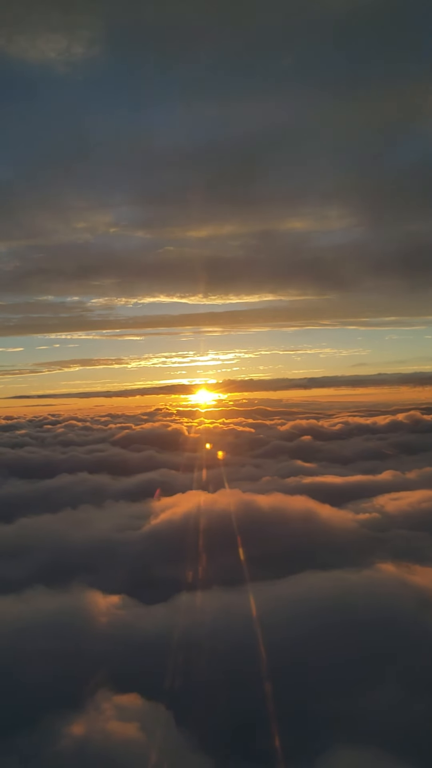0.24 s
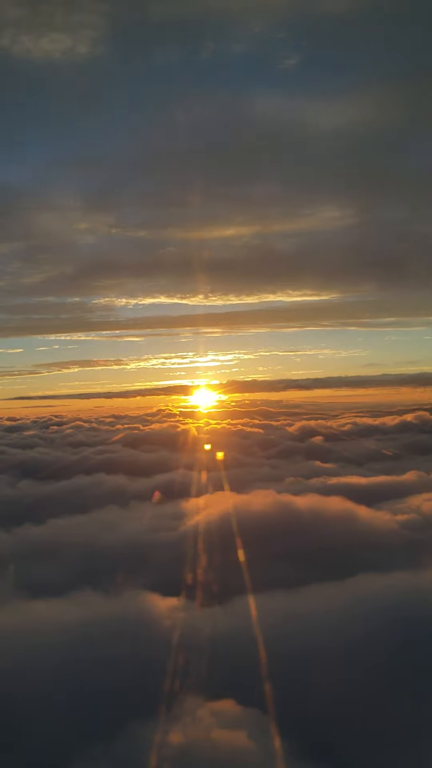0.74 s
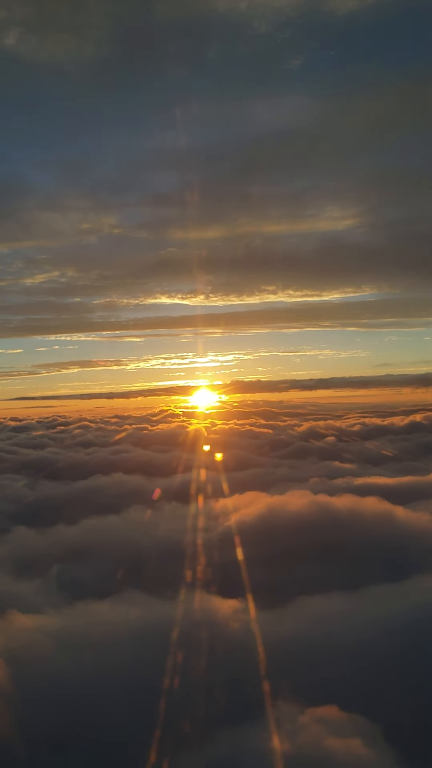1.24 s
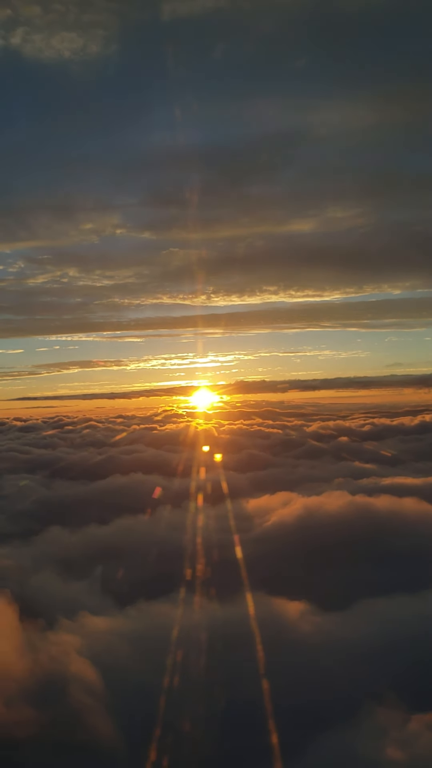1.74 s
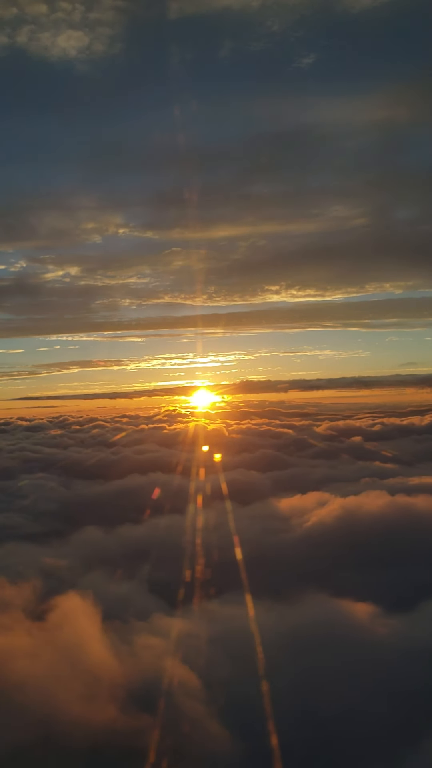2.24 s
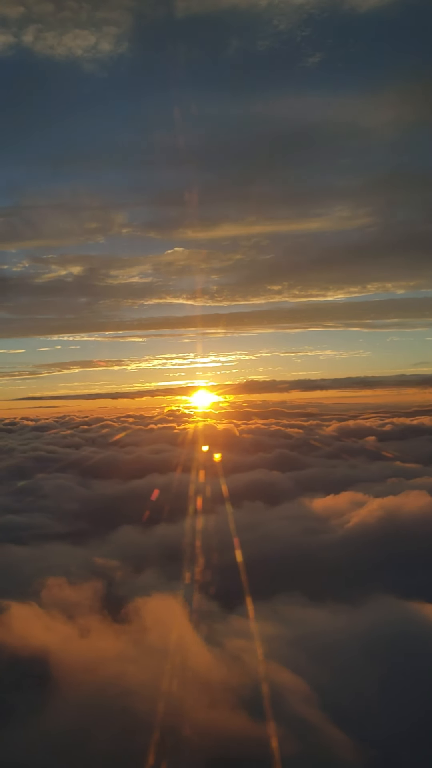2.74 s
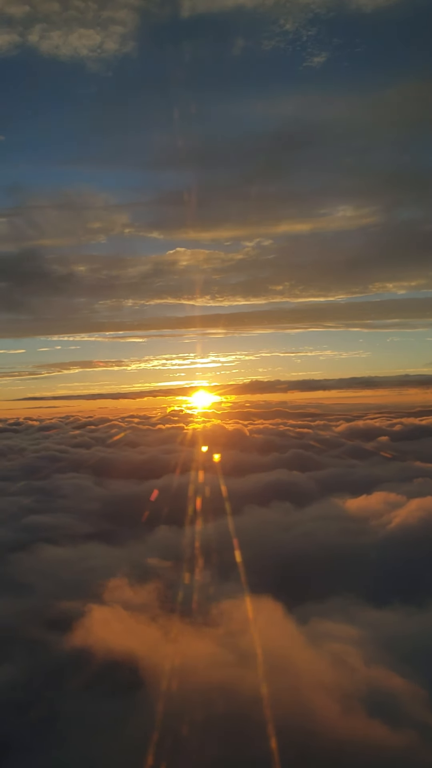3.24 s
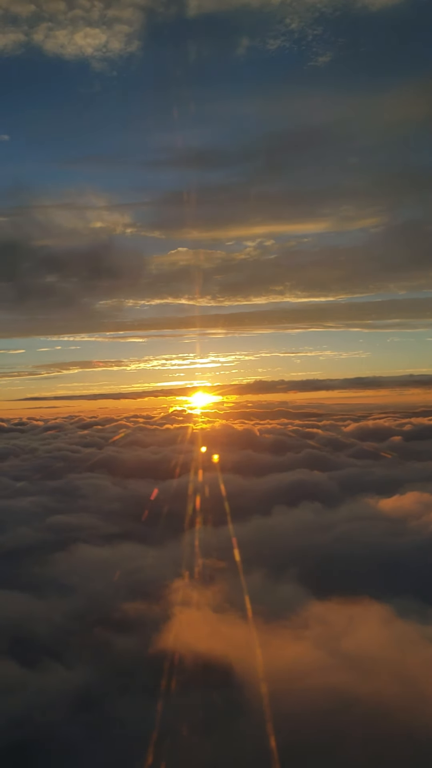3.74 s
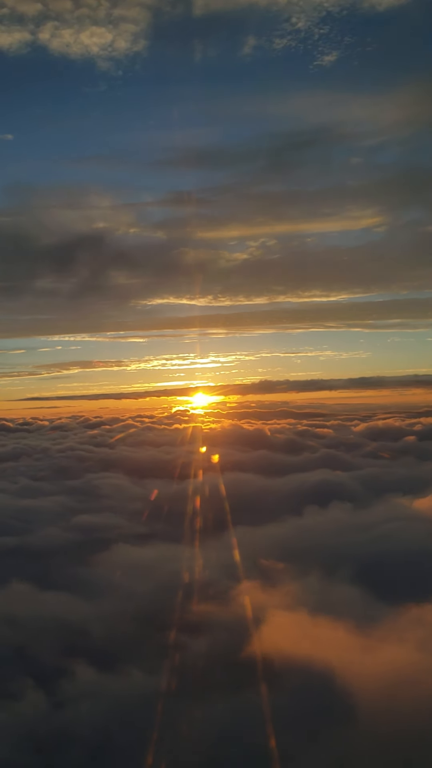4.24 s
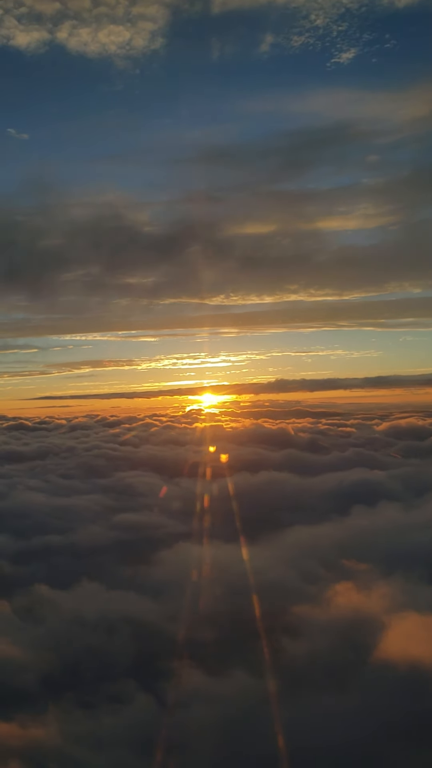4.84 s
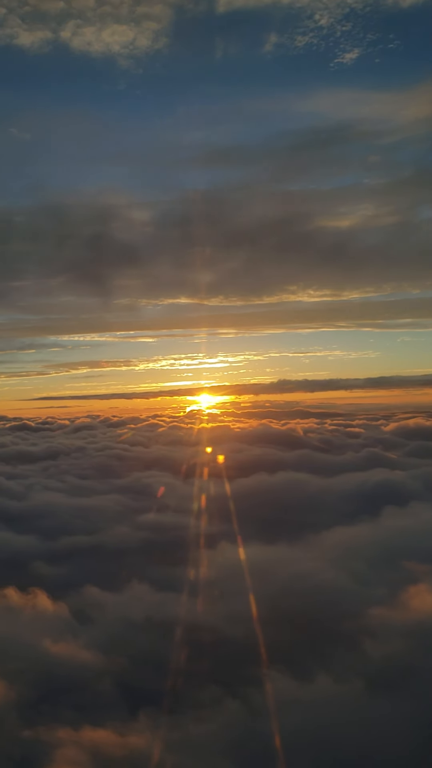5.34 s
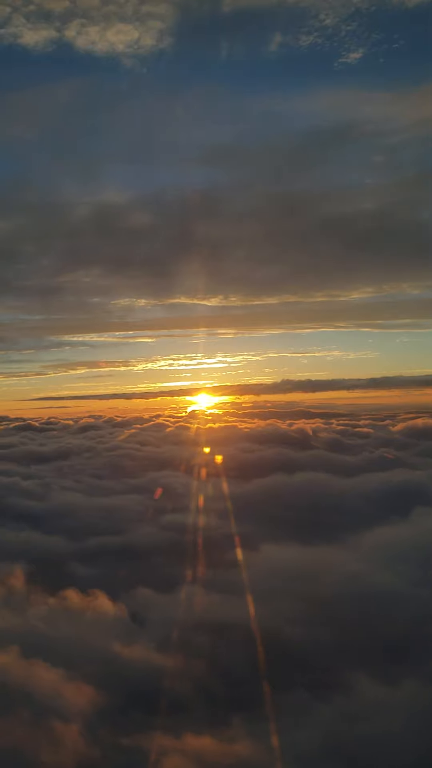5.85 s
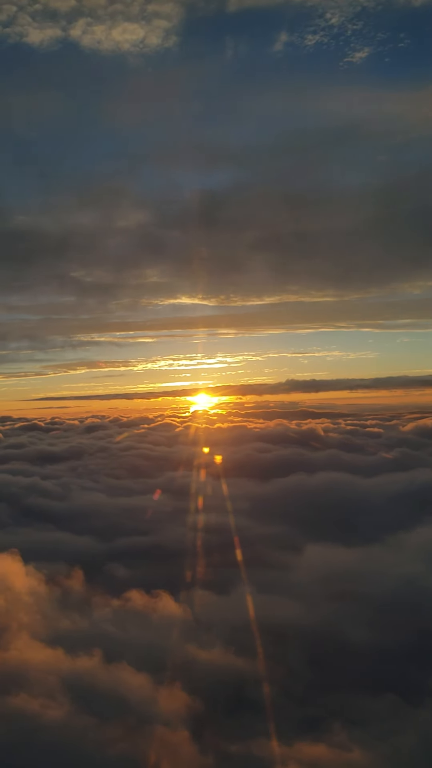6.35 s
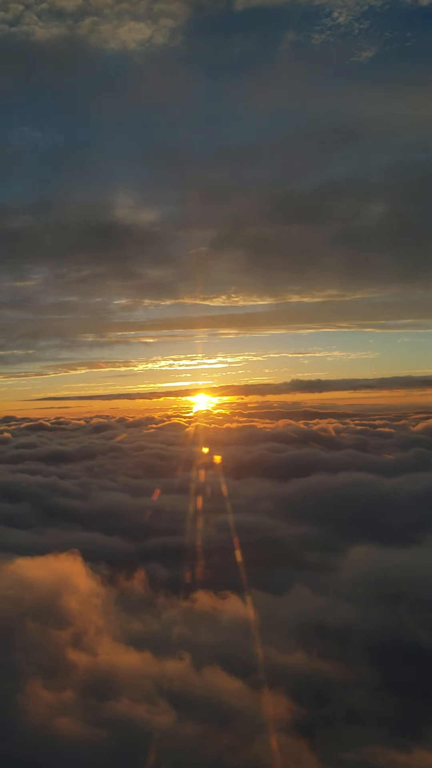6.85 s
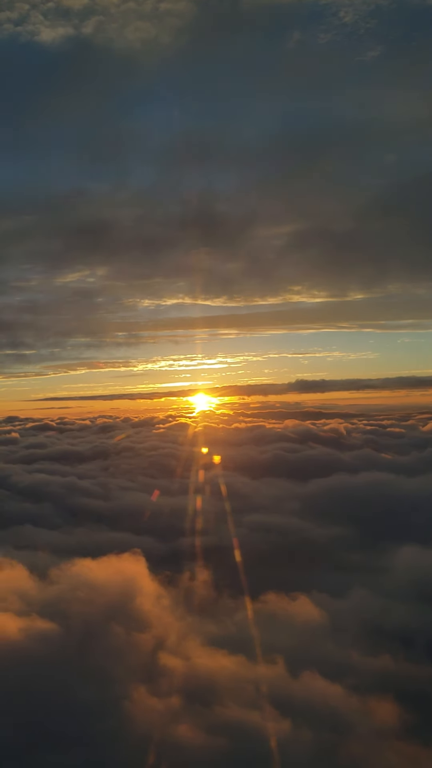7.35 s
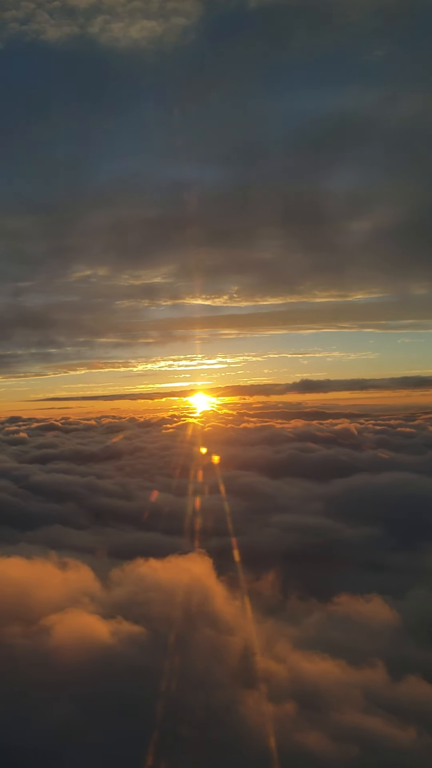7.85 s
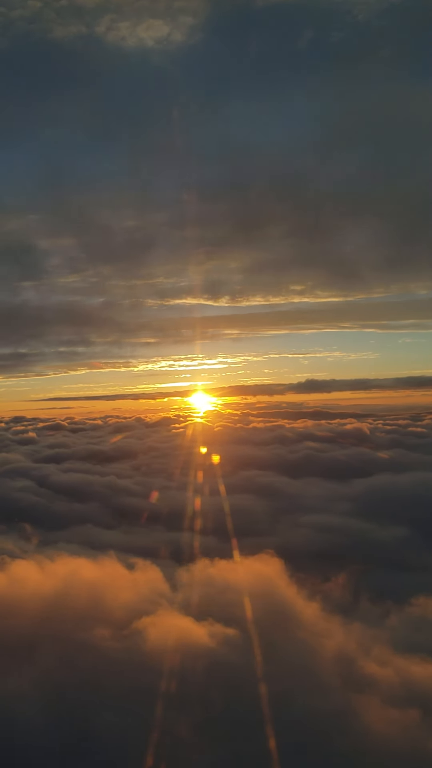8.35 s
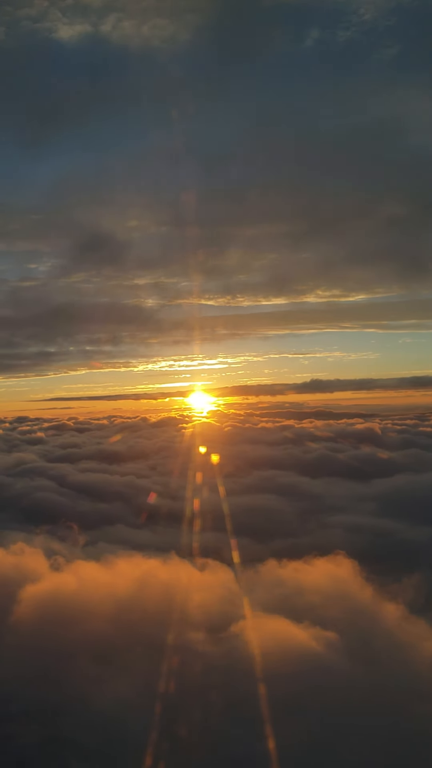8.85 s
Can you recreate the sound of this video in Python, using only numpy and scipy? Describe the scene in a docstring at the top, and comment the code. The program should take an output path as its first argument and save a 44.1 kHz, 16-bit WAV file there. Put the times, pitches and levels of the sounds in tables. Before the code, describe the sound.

Inside a cruising airliner, a steady, bass-heavy rush of air runs under a deep engine hum that gently swells and eases, with very faint high whines. Plastic trim clacks softly near the start, and a few tiny ticks follow, the sharpest about midway. Near the end something soft slides nearby with a faint squeaky rustle. The drone surrounds the microphone in the cabin.

```python
"""Inside an airliner in cruise. From the start, turbulent air along the hull excites the cabin's resonances,
and the engines add a deep hum, weak shaft tones and thin whines. Plastic trim clacks faintly, then the
hum swells and tiny, sparse ticks begin. From 3 s the fan slows and its hum sinks a little in pitch; the
sharpest tick comes near 4 s. The hum swells again near 5.5 s and 8 s. Last, something soft slides nearby
with a squeaky rustle."""
import sys
import numpy as np
from scipy import signal
from scipy.fft import rfft, irfft
from scipy.io import wavfile

SR = 44100
rng = np.random.default_rng(int(sys.argv[2]) if len(sys.argv) > 2 else 0)


def generate_wav(signal):
    """Clip the signal to [-1, 1] and save it as 16-bit WAV at the path in sys.argv[1]."""
    frames = np.transpose(np.atleast_2d(signal))
    scaled = np.clip(frames, -1, 1) * 32767
    pcm = np.round(scaled).astype(np.int16)
    wavfile.write(sys.argv[1], SR, pcm)


N = 401310
TIME = np.arange(N) / SR
HZ = np.maximum(np.arange(N // 2 + 1) * SR / N, 1)


def from_db(db):
    """Amplitude ratio of a level in decibels."""
    return 10 ** (np.asarray(db) / 20)


def rms_one(x):
    """Normalisation to unit rms."""
    return x / np.sqrt(np.mean(x ** 2) + 1e-20)


def in_time(rows):
    """Linear interpolation of each column over time."""
    times, *columns = np.transpose(rows)
    return [np.interp(TIME, times, column) for column in columns]


def over_hz(points):
    """Linear interpolation over log frequency."""
    hz, value = np.transpose(points)
    return np.interp(np.log(HZ), np.log(hz), value)


def white():
    """Spectra of two uncorrelated white noises, power 1 per Hz."""
    return rfft(rng.standard_normal((2, N))) * np.sqrt(SR / 2)


def bell(hz, width):
    """Lorentzian resonance curve, 1 at its peak."""
    return 1 / (1 + (2 * (HZ - hz) / width) ** 2)


def pan(db):
    """Constant-power panning: gains for a left minus right level."""
    gains = from_db(np.array([[.5], [-.5]]) * db)
    return gains / np.sqrt(np.mean(gains ** 2, axis=0))


def drift(rate_hz):
    """Low-pass noise: a slow random fluctuation of unit rms."""
    return rms_one(irfft(white()[0] / (1 + (HZ / rate_hz) ** 4), N))


def fading(events, t60):
    """Exponential decay from a sudden onset at each event."""
    return sum((TIME >= s) * from_db(db - 60 * np.clip((TIME - s) / t60, 0, 4)) for s, db in events)


def wavering_tone(hz, waver_hz, rate_hz, flutter_db=2.5):
    """Random frequency and amplitude modulation of a sine, at unit rms."""
    turns = np.cumsum(hz + waver_hz * drift(rate_hz)) / SR + rng.random()
    return rms_one(np.sin(2 * np.pi * turns) * from_db(flutter_db * drift(rate_hz)))


# whistles: (frequency [Hz], width [Hz], mid-scene level [dB], left minus right [dB], growth [dB/s])
VENT_WHISTLES = [(2670, 45, -61, 0, 1), (3890, 8, -70, 8, .6), (4930, 45, -70, -7, 0.5)]

def vents():
    """Narrow-band noise: air fans and vents whistle faintly, uncorrelated at the two microphones."""
    out = np.zeros((2, N))
    for hz, width, db, pan_db, growth in VENT_WHISTLES:
        whistle = rms_one(irfft(white() * bell(hz, width), N))
        out += whistle * from_db(db + growth * (TIME - TIME.mean())) * pan(pan_db)
    return out


# turbine whines: (time [s], level of the lower [dB], level of the upper [dB])
TURBINE_LEVELS = [(0, -63, -73), (.45, -60, -76), (.85, -66, -64), (1.7, -68, -72), (2.15, -62, -70),
                  (3.5, -65, -73), (4.8, -59, -67), (5.4, -69, -63), (6.15, -62, -67), (6.6, -64, -66),
                  (7.4, -59, -70), (8.05, -68, -62), (8.45, -64, -60), (9.1, -67, -64)]

def turbines(pitches_hz=(4997, 5052), pan_db=-5.5):
    """Multipath propagation: two turbine whines reach each microphone by its own paths and waver there."""
    out = np.zeros((2, N))
    for hz, level_db in zip(pitches_hz, in_time(TURBINE_LEVELS)):
        sides = np.array([wavering_tone(hz, waver_hz=5, rate_hz=12) for _ in range(2)])
        out += sides * from_db(level_db) * pan(pan_db)
    return out


# shaft tones: (frequency [Hz], level [dB], left minus right [dB])
SHAFT_PARTIALS = [(76.2, -40, -1), (145.8, -38, 2), (196.4, -31.5, 5)]

def shafts():
    """Periodic forcing: the faster engine shafts add weak, slightly wavering tones to the drone."""
    return sum(wavering_tone(hz, waver_hz=0.77, rate_hz=2.2) * from_db(db) * pan(pan_db)
               for hz, db, pan_db in SHAFT_PARTIALS)


# sliding strokes: (centre time [s], half-length [s], level [dB])
STROKES = [(8.51, .04, -48), (8.67, .17, -48), (8.925, .05, -40), (9.02, .08, -48)]
# friction spectrum: (frequency [Hz], relative level [dB])
FRICTION_SPECTRUM = [(800, -30), (2300, 2), (3500, -4), (4300, -12), (6000, -30), (12000, -45)]
# squeaks: (centre time [s], half-length [s], level [dB], frequency [Hz])
CATCHES = [(8.5, .025, -45.5, 2680), (8.605, .025, -43, 2150), (8.67, .025, -42, 2090),
           (8.745, .035, -40, 2130), (8.96, .045, -49, 3170), (9.06, .04, -54, 3160)]

def rustle(waver_hz=11.8, pan_db=-3):
    """Sliding friction: something soft rubs in a few strokes and squeaks where it catches."""
    def swell(s, half_length, db):
        """Gaussian envelope."""
        return from_db(db) * np.exp(-2 * np.minimum(((TIME - s) / half_length) ** 2, 50))
    friction = rms_one(irfft(white() * from_db(over_hz(FRICTION_SPECTRUM)), N))
    rubbing = friction * sum(swell(*stroke) for stroke in STROKES)
    waver_turns = np.cumsum(waver_hz * drift(32)) / SR
    squeaks = sum(swell(*catch) * np.sqrt(2) * np.sin(2 * np.pi * (hz * TIME + waver_turns))
                  for *catch, hz in CATCHES)
    return (rubbing + squeaks) * pan(pan_db)


# snap of plastic trim: (time [s], peak level [dB])
TRIM_SNAPS = [(0.3876, -28)]

def clack(band_hz=(2200, 4600), pan_db=-2):
    """Damped impulse response: plastic trim snaps once, a dry click in the upper middle."""
    impulses = np.zeros(N)
    for s, db in TRIM_SNAPS:
        impulses[int(s * SR)] = from_db(db)
    click = signal.sosfilt(signal.butter(4, band_hz, "band", fs=SR, output="sos"), impulses)
    return click * impulses.max() / abs(click).max() * pan(pan_db)


# hard contacts: (time [s], relative level [dB])
CONTACTS = [(.775, -47), (3.71, -46), (4.0851, -29), (4.086, -17), (4.0911, -29), (5.5998, -48),
            (5.66, -48), (7.7869, -38.5), (8.03, -48)]
# modes of the ticking part: (frequency [Hz], relative level [dB], 60 dB decay time [s])
PART_MODES = [(7600, -21, .004), (11100, -4, .005), (11550, 4, .005), (12150, 5, .0044), (12900, -2, .003),
              (14400, -5, .003), (15200, -11, .003)]

def ticks(snap_db=5, grit_db=-4, grit_t60=0.005, tail_db=-23, tail_t60=0.115, gain_db=-6.5, pan_db=3):
    """Modal ringing: gritty contacts strike a small hard part; the cabin scatters a short, bright tail."""
    snap = np.zeros(N)
    for s, db in CONTACTS:
        snap[int(s * SR)] = from_db(db + snap_db)
    grit = from_db(grit_db) * fading(CONTACTS, grit_t60)
    tail = from_db(tail_db) * fading(CONTACTS, tail_t60)
    ring = np.zeros((2, N))
    for hz, mode_db, t60 in PART_MODES:
        radius = from_db(-60 / (t60 * SR))
        feedback = [1, -2 * radius * np.cos(2 * np.pi * hz / SR), radius ** 2]
        force = snap + (grit + tail) * rng.standard_normal((2, N))
        ring += from_db(mode_db) * signal.lfilter([np.sqrt(1 - radius ** 2)], feedback, force)
    # so small a part radiates only the top of the treble, where the microphones have a dip
    ring = signal.sosfilt(signal.butter(2, (7600, 10000), "bandstop", fs=SR, output="sos"), ring)
    ring = signal.sosfilt(signal.butter(10, 7000, "high", fs=SR, output="sos"), ring)
    return ring * from_db(gain_db) * pan(pan_db)


# hum of the fan shaft: (time [s], level [dB])
HUM_LEVEL = [(0, -25), (.75, -20), (1.35, -19), (1.85, -25), (2.2, -22.5), (3.2, -23), (3.8, -25),
             (4.35, -20.5), (4.6, -23.5), (5.28, -18), (6.1, -18.5), (7.05, -22), (8.15, -16.5), (9.1, -19)]

def engine_hum(fan_hz=60.63, ease_from_s=3.02, sag_hz_per_s=0.2086, pan_db=1):
    """Rotating unbalance: the fan shakes the cabin once a turn, so the pitch sinks as it slows."""
    speed_hz = fan_hz - sag_hz_per_s * np.maximum(TIME - ease_from_s, 0)
    turns = np.cumsum(speed_hz) / SR + rng.random()
    level_db, = in_time(HUM_LEVEL)
    return np.sqrt(2) * np.sin(2 * np.pi * turns) * from_db(level_db) * pan(pan_db)


# coherence of left and right, real part: (frequency [Hz], coherence [-1 to 1])
IN_PHASE = [(50, .999), (130, 0.96), (260, 0.97), (350, 0.68), (510, 0.89), (600, 0.36), (930, 0.46),
            (1150, -0.11), (1850, -0.28), (2200, -0.024)]
# its imaginary part, a quarter cycle apart: (frequency [Hz], coherence [-1 to 1])
QUADRATURE = [(100, -0.11), (260, 0.04), (450, -0.056), (620, 0.62), (800, -0.057), (1050, -0.22),
              (2400, -0.29), (3200, 0.2), (4000, -0.0072)]
# airflow noise before the resonances: (frequency [Hz], spectral density level [dB])
RUSH_SPECTRUM = [(20, -64), (36, -68), (48, -40.5), (242, -43.5), (301, -50), (966, -53), (1351, -60.5),
                 (1838, -62.5), (3028, -78.5), (4641, -84.5), (6946, -96), (8420, -105.8), (9071, -98.5),
                 (15600, -95.5)]
# cabin resonances and dips: (frequency [Hz], width [Hz], left gain [dB], right gain [dB])
CABIN_RESONANCES = [(74.7, 9.9, 0, 0), (112, 29, -2.5, -2.5), (145.8, 17, 5.5, 3.5), (250.6, 18, 5, 5.5),
                    (303, 10.2, 6.5, 5.5), (497, 27, 6.5, 1.5), (559, 40, -3, -4), (618, 46, 2.5, 3.5),
                    (882, 180, 2, 3.5), (940, 110, 1.5, 1.5), (1043, 57, -1, -2.5), (1106, 60, 0.5, -0.5),
                    (1950, 350, 0, 2.5), (3420, 220, -6, 4.5), (3850, 490, 0, -3.5), (4300, 300, 2, 2),
                    (5040, 180, 0, 7), (6820, 830, 7, 6)]
# balance of the sound field: (frequency [Hz], left minus right [dB])
FIELD_BALANCE = [(50, 0), (150, 1.5), (280, 1), (370, 3.5), (500, 3), (700, -1.5), (900, -1.5), (1150, 0.5),
                 (2000, -2), (3300, -5.5), (3800, -1), (6000, 0), (7200, -11), (8800, 1), (15000, 4.0)]

def cabin_field():
    """Resonance and spatial coherence: the cabin colours two noise spectra, alike for long waves."""
    left, independent = white()
    coherence = over_hz(IN_PHASE) + 1j * over_hz(QUADRATURE)
    coherence /= np.maximum(abs(coherence) / .999, 1)  # magnitude stays below 1
    right = coherence * left + np.sqrt(1 - abs(coherence) ** 2) * independent
    resonance_db = sum(np.outer(gains, bell(hz, width)) for hz, width, *gains in CABIN_RESONANCES)
    colour = from_db(over_hz(RUSH_SPECTRUM) + resonance_db)
    return np.array([left, right]) * colour * pan(over_hz(FIELD_BALANCE))


# level of the rush as heard; the gain dips slightly from about 2.4 to 4.3 s: (time [s], gain [dB])
HEARD_RUSH_GAIN = [(0, 0.2), (.5, 0), (1.1, -0.56), (1.8, -.05), (2.27, 0.1), (2.42, -.65), (3.3, -0.65),
                   (3.95, -0.6), (4.3, -0.5), (4.75, -0.1), (5.2, -0.1), (6.2, -0.34), (7.3, 0.16),
                   (8.3, 0), (8.6, -0.5), (9.1, 0.7)]
# level of the low rumble: (time [s], relative level [dB])
RUMBLE_LEVEL = [(0, 0), (.4, 0.5), (1.0, -.9), (1.5, -0.4), (2.25, 0.6), (2.62, -3), (3.3, 1.5),
                (3.8, -1.5), (4.0, -0.5), (4.7, 0.3), (5.0, 0.5), (5.4, 2), (5.6, -1.9), (6.2, 0.8),
                (6.5, -3), (7.1, 1.8), (7.7, -1), (9.1, 0.5)]
# level of the hollow band within the rush: (time [s], relative level [dB])
HOLLOW_LEVEL = [(0, 0), (2.2, 0), (4.0, -0.6), (4.85, 2), (5.15, -1), (6.7, -.2), (7.8, 0), (8.6, 0.6),
                (8.9, -2.3)]

def airflow(split_hz=300, hollow_hz=915, hollow_width_hz=200, eddy_db=0.32, eddy_hz=12,
            rush_gain_db=0.21, rumble_gain_db=-0.32):
    """Boundary-layer turbulence on the hull: big eddies buffet the bass, fine ones make an even rush."""
    field = cabin_field()
    bass = 1 / (1 + (HZ / split_hz) ** 6)
    hollow = bell(hollow_hz, hollow_width_hz)
    rumble_db, hollow_db = in_time(RUMBLE_LEVEL) + in_time(HOLLOW_LEVEL)
    fine = field * (1 - bass)
    rush = irfft(fine * (1 - hollow), N) + irfft(fine * hollow, N) * from_db(hollow_db)
    flutter_db = eddy_db * drift(eddy_hz)
    rumble = irfft(field * bass, N) * from_db(rumble_gain_db + rumble_db + flutter_db)
    heard_db, = in_time(HEARD_RUSH_GAIN)
    return rumble + rush * from_db(rush_gain_db + heard_db)


def scene():
    """Superposition: all sources add at one place in the cabin."""
    return airflow() + engine_hum() + shafts() + turbines() + vents() + ticks() + clack() + rustle()


def record(dry, cutoff_hz=15800, fade_s=.002):
    """Band limiting: a steep low-pass cuts the top; short fades keep both ends free of clicks."""
    out = signal.sosfiltfilt(signal.ellip(10, .05, 60, cutoff_hz, fs=SR, output="sos"), dry)
    return out * np.clip(np.minimum(TIME, TIME[-1] - TIME) / fade_s, 0, 1)


dry = scene()
out = record(dry)
generate_wav(out)
```